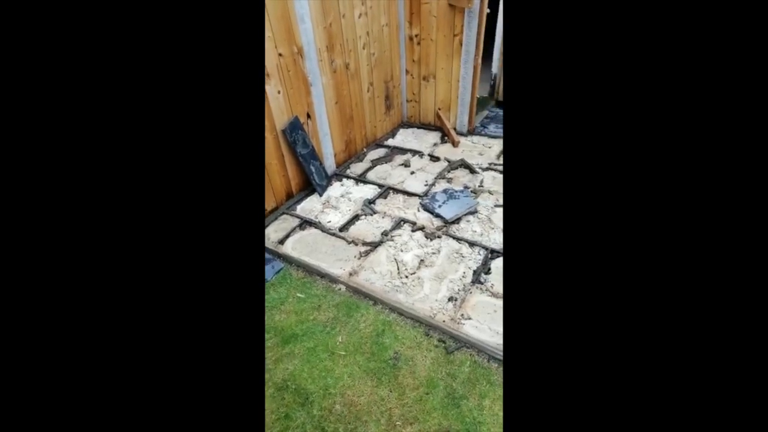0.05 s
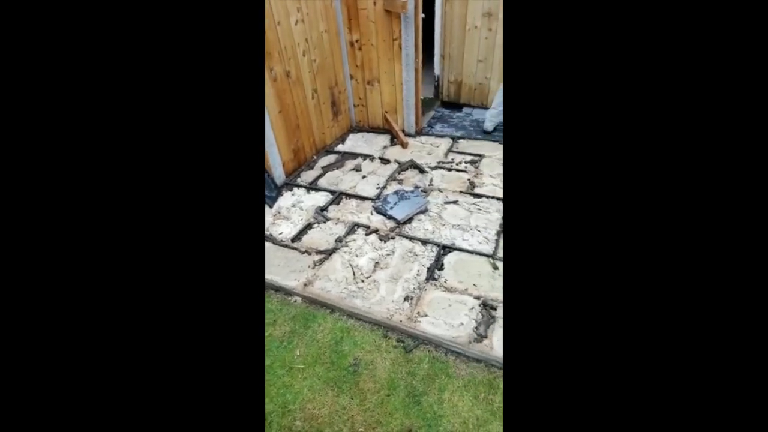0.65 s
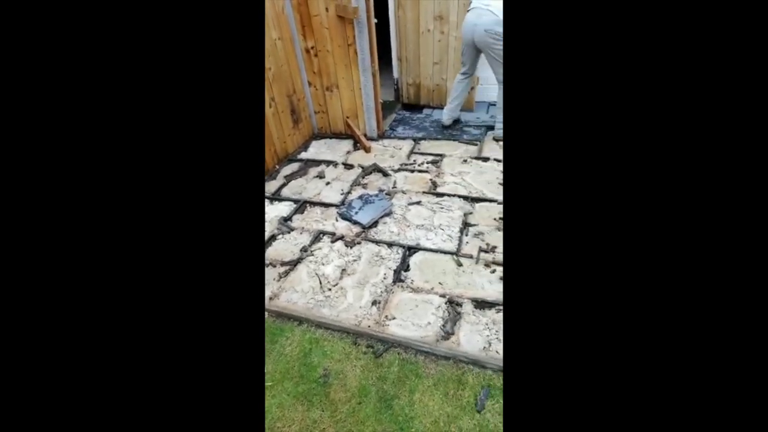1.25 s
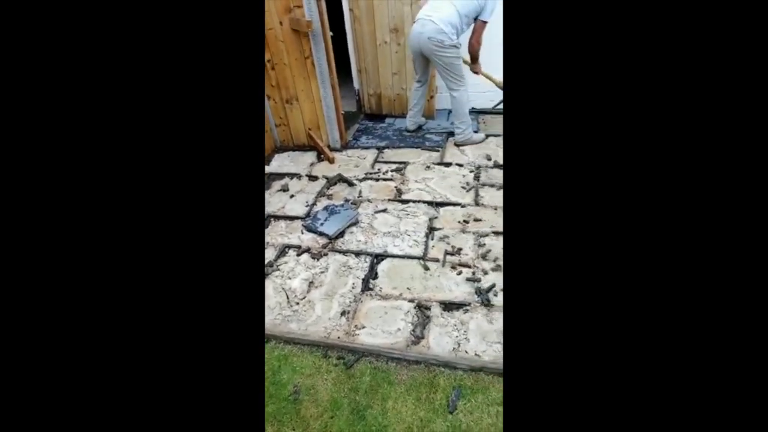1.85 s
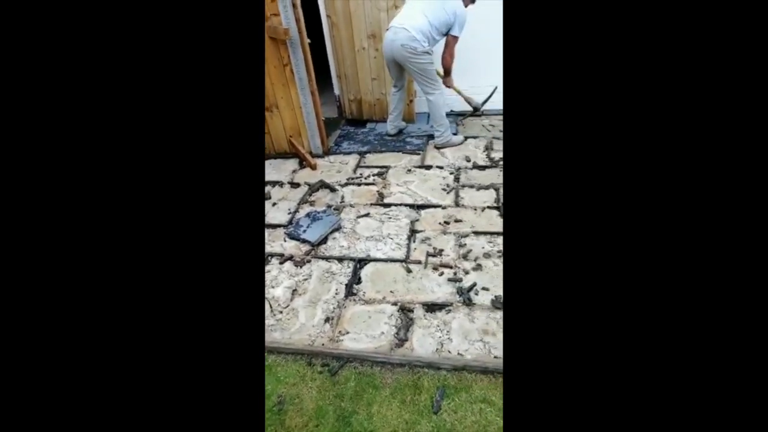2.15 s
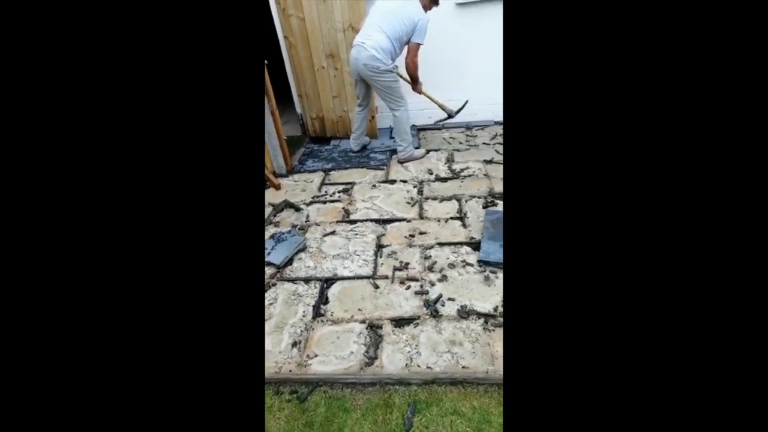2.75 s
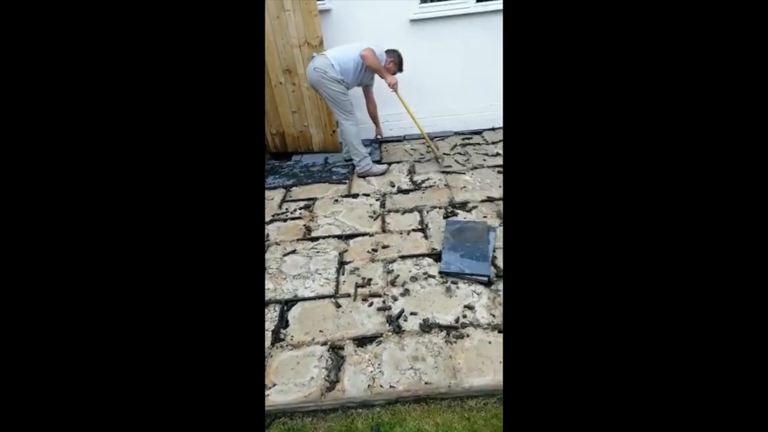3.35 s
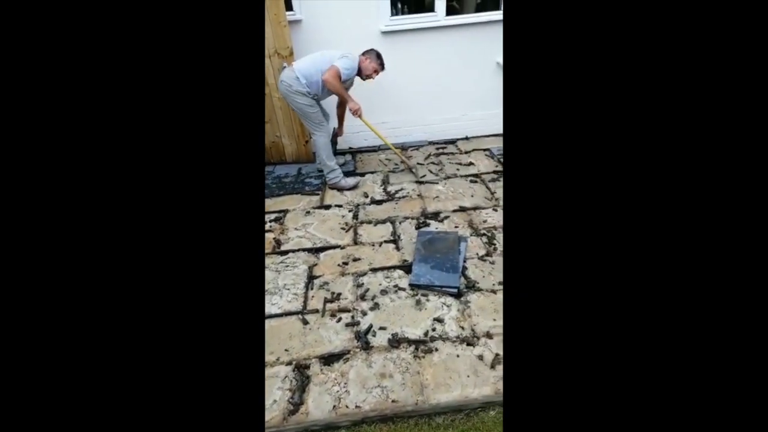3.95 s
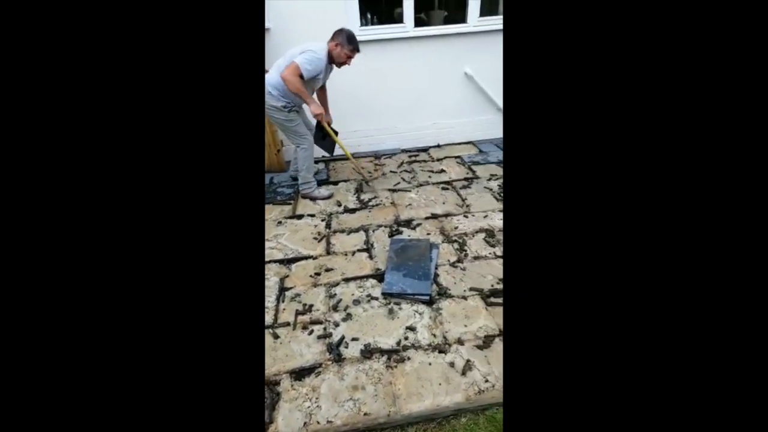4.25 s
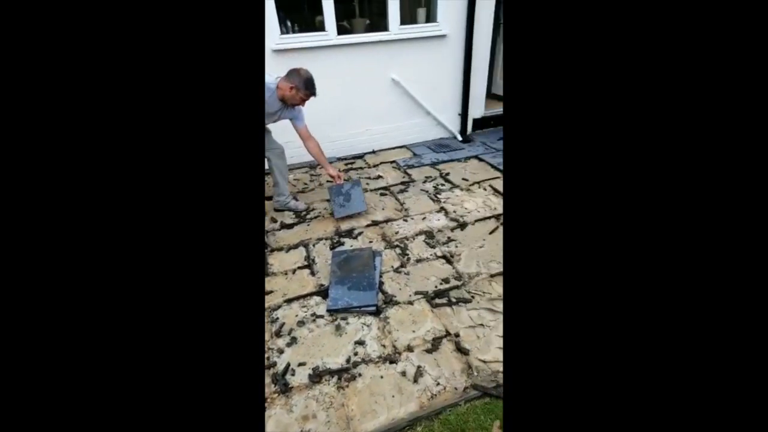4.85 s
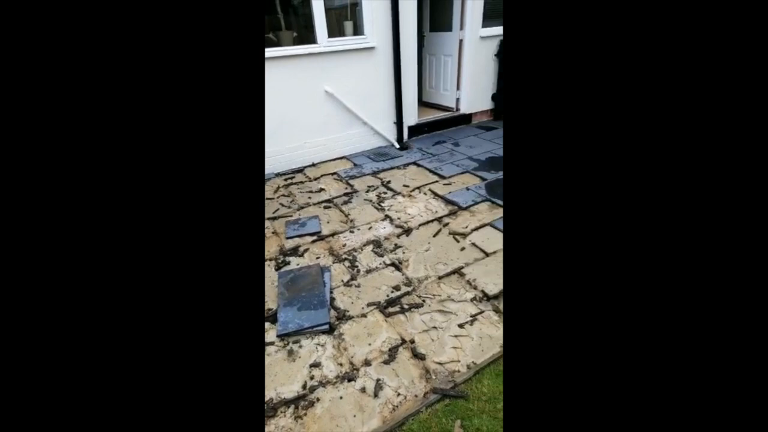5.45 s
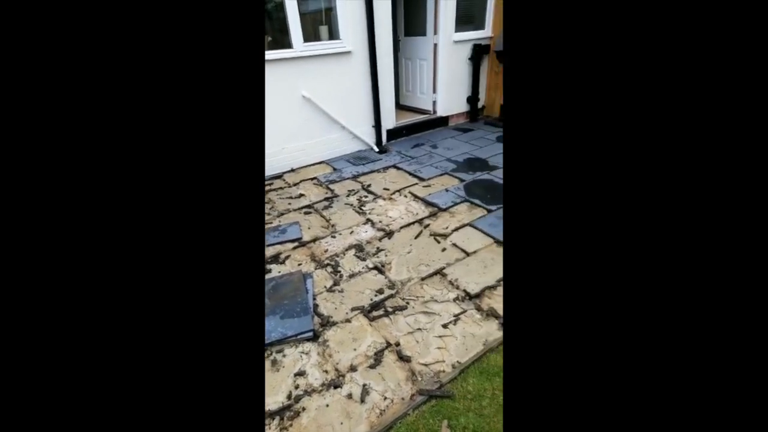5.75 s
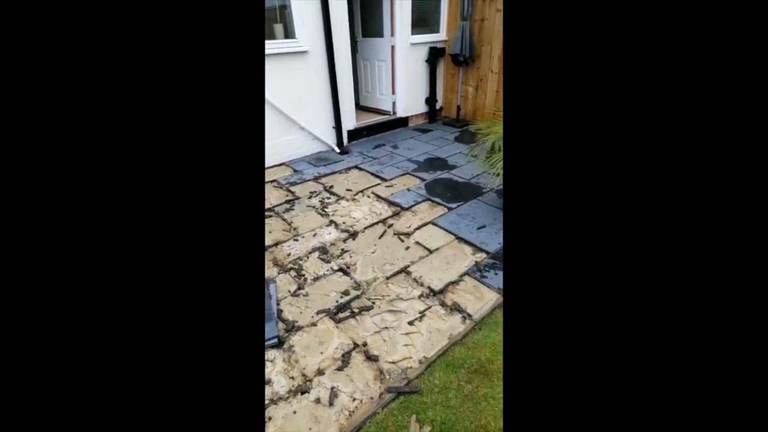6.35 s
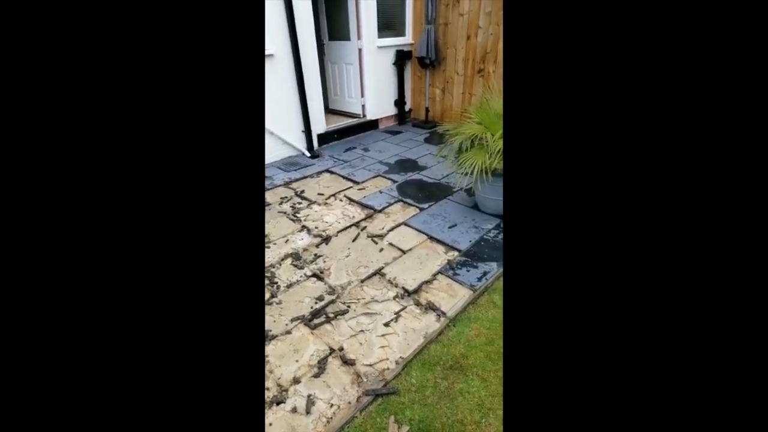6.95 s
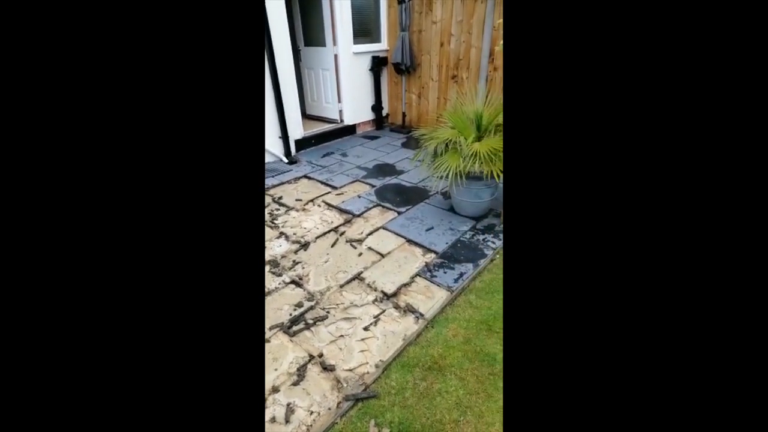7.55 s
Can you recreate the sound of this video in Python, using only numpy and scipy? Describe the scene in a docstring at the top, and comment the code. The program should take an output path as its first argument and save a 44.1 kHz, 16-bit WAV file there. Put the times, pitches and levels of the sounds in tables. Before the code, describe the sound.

Close, thudding pickaxe blows break mortar and lever up slate, which is tossed down with a clatter before light shovel scrapes.

```python
"""A walled patio, where slates are levered up with a pickaxe close by.
Mortar crunches and slabs thud under the ringing steel; one slate is dragged free, tossed aside
and clatters down. Grit slides, a chip skips, and a shovel scrapes as stones catch on its blade.
Two short bird chirps at the start and, later, one tiny high clink sound over a light breeze.
Wall and fences echo. The loudest blows overload the microphone."""
import sys
import numpy as np
from scipy import signal
from scipy.fft import rfft, irfft
from scipy.io import wavfile
from scipy.ndimage import uniform_filter1d

SR = 44100
rng = np.random.default_rng(int(sys.argv[2]) if len(sys.argv) > 2 else 0)


def store_pcm(level_fs):
    """Save levels as 16-bit WAV."""
    pcm = np.round(np.clip(level_fs, -1, 1) * 32767).astype(np.int16)
    wavfile.write(sys.argv[1], SR, np.atleast_2d(pcm).T)


N = 339084

# Spectra of distant wash, wind and crushed stone. Each row: frequency in Hz, relative density in dB.
WASH_SPECTRUM = [(15, -4), (25, -13), (48, 5.5), (69, -5.5), (133, -9), (188, -9.5), (567, -28),
                 (2060, -19.5), (3090, -27), (4500, -27.5), (8350, -43.5), (10900, -34), (14300, -53),
                 (15500, -68)]
WIND_SPECTRUM = [(15, -7.5), (30, -5.5), (65, 0), (120, -12.5), (220, -25), (600, -58)]
STONE_SPECTRUM = [(100, -17), (350, -12.5), (600, -14.5), (950, -5.5), (1550, -2), (2400, 0.5), (3200, -8),
                  (5000, -10.5), (7500, -18.5), (11000, -17.5), (15000, -31)]
# Gusts on the microphone. Each row: peak time in seconds, level in dB.
GUSTS = [(.5, -25.5), (1.06, -31), (1.33, -36), (2.29, -33), (3.15, -38), (5.84, -21.5)]
# Two bird chirps, then one tiny high clink. Each row: start and length in seconds,
# first and last pitch in Hz, level in dB.
CHIRPS_AND_CLINK = [(0.084, 0.064, 3680, 3480, -43), (0.137, 0.05, 3420, 3670, -43),
                    (2.342, 0.028, 6840, 6540, -37.5)]
# Echo decay. Each row: frequency in Hz, T60 in seconds.
ECHO_T60 = [(100, 0.85), (400, 0.64), (1500, 0.51), (2500, 0.64), (5000, 0.57), (12000, 0.55)]
# Echo colour. Each row: frequency in Hz, gain in dB.
ECHO_GAIN = [(100, -5.5), (400, -8), (1500, 1.5), (2500, -3.5), (5000, -7), (12000, -13.5)]
# Shovel resonances. Each row: frequency in Hz, width in Hz, relative level in dB.
BLADE_MODES = [(283, 84, -16), (440, 630, -21.5), (904, 27, -8.5), (1183, 20.6, 5.5), (1714, 16, 2.5),
               (1940, 38, 7.5), (2086, 9.9, 2), (2288, 5.4, 8.5), (2716, 4.5, 4.5), (2850, 14, -47),
               (3620, 29, -14), (4970, 84, -12.5), (10200, 4700, -32)]
# Shovel strokes. Each row: start and length in seconds, relative level in dB, width factor,
# pitch factor, tilt in dB/octave.
SHOVEL_STROKES = [(0.401, 0.18, -32.5, 5.5, 1.01, -7.5), (0.986, 0.011, -26.5, 1.1, 1.06, 1),
                  (1.055, 0.046, -20, 1.6, 1, -4.5), (6.109, .29, -26.5, 3.3, 1.02, -4),
                  (6.44, 0.085, -39.5, 3.3, 0.96, -9), (6.676, 0.23, -37.5, 3.2, 1.066, -4.5),
                  (7.089, 0.13, -32.5, 2.1, 1.025, -1.5), (7.552, 0.042, -39.5, 2.6, 0.96, -4),
                  (7.66, .06, -16.5, 0.85, .982, -1)]
# Sliding grit. Each row: peak time in seconds, level in dB, rise and fall in seconds, tilt in dB/octave.
GRIT_SLIDES = [(0.498, -30.5, 0.06, 0.13, -1), (.991, -32.5, 0.051, 0.053, 1),
               (1.414, -34, 0.026, 0.031, 5.5), (2.79, -16.5, .03, 0.077, -6),
               (3.07, -20.5, 0.02, 0.062, -5), (3.303, -38.5, .07, 0.12, 2.5), (3.74, -26, 0.038, 0.14, -5),
               (4.303, -47, 0.0097, 0.16, 1), (4.799, -33, .065, 0.43, 0),
               (5.545, -15.5, 0.028, 0.034, -1.5), (5.638, -31.5, 0.014, 0.099, -4.5),
               (6.2, -37, 0.21, 0.6, -1.5)]
# Slabs rocking under foot or lever. Each row: start in seconds, level in dB, mid-glide pitch in Hz,
# decay in seconds.
LOOSE_SLABS = [(0.451, -20, 115.4, 0.044), (.51, -21, 147, .069), (1.074, -14.5, 205, 0.033),
               (1.431, -21.5, 132, 0.0087), (3.922, -18.5, 185, 0.023)]
# Light touches of stone on stone. Each row: time in seconds, level in dB, tilt in dB/octave.
STONE_TAPS = [(.927, -31, -2), (.982, -26, 3.5), (2.494, -13, -1.5), (3.001, -37, -5.5), (3.052, -20, -6),
              (3.853, -27.5, -2), (4.71, -29, 2.5), (5.833, -31.5, -1.5), (6.088, -30.5, -6),
              (6.809, -38, 1.5), (7.069, -35, -12)]
# Slate or steel landing with its weight. Each row: time in seconds, crunch in dB, decay in seconds,
# tilt in dB/octave, thud in dB, mid-glide thud pitch in Hz.
LANDINGS = [(1.055, -18.5, 0.03, 1, -6.5, 108.8), (2.573, -21, 0.03, -1.5, -7, 193),
            (2.813, -7.5, 0.019, 1, -7.5, 176), (2.938, -2, 0.019, -1, -13, 168),
            (3.126, -11, 0.013, -1.5, 4.5, 181.3), (3.17, -21, .04, 0, -13.5, 164),
            (3.657, -29.5, 0.069, -4, -22, 215), (4.47, -18.5, 0.067, -1.5, -27.5, 189),
            (4.542, -15.5, 0.016, 2, -20.5, 194), (4.637, -17, 0.029, 2, -6.5, 163.6),
            (4.755, -23, 0.026, -7, -22.5, 211), (5.004, -19, 0.019, 6.5, -2, 199),
            (5.032, -4.5, 0.021, -9, 1.5, 194), (5.14, -1.5, 0.018, -5, -15, 238),
            (5.281, -4, 0.0056, -6, -14, 252), (5.484, -18, 0.055, -2.5, -30, 199.5)]
# Full swings into the joint. Each row: time in seconds, bite in dB, tilt in dB/octave,
# crumbling in dB, thud in dB, mid-glide thud pitch in Hz.
SWINGS = [(.215, -1, 1, -24, -3, 149.4), (1.604, 0, -1.5, -16.5, 0, 126.5),
          (2.203, -2, -1.5, -16, 2.5, 121.3)]
# Modes of a slate chip, a paver, the loose slate and the steel pick.
# Each row: frequency in Hz, relative level in dB, base T60 in seconds.
CHIP_MODES = [(2040, -13, 0.18), (2360, -6, .29), (4580, -12, 0.16), (5250, -20, 0.14)]
PAVER_MODES = [(601, 2, 0.18), (1232, -0.5, 0.46), (1476, -1, 0.42)]
SLATE_MODES = [(859.5, -10, 0.52), (1511, -5.5, 0.65), (1530, -2, 0.6), (2099, -0.5, 0.56),
               (2114, -3.5, 0.2), (3650, -8, 0.39), (4080, -27, 0.72), (4360, -19.5, 0.65),
               (6020, -27.5, 0.56), (7320, -23.5, 0.35), (9400, -31, 0.48), (10160, -30, 0.43),
               (11600, -27, 0.28)]
PICK_MODES = [(714, -8, 0.68), (969, -4.5, 0.89), (1211, 2, 0.75), (1438, 9, 0.65), (1544, 8, 0.6),
              (1638, 3.5, 0.52), (1935, -8, 0.51), (2190, 8.5, 0.26), (2275, -2, 0.24), (2330, 3, 0.68),
              (2635, -16, 0.25), (2873, 8.5, 0.21), (3590, -17, 0.98), (3960, -3.5, 0.24), (4350, -8, 0.34),
              (4870, -16, 0.52), (5260, -15, 0.29), (5650, -19, 0.31), (6390, -12, 0.53),
              (10540, -10, 0.47)]
# Blows on those bodies. Each row: start in seconds, level in dB, focus in Hz, T60 factor.
CHIP_SKIPS = [(4.471, -20, 4850, 0.69), (4.488, -20.5, 4700, .9), (4.502, -18, 2400, 0.93),
              (4.659, -11.5, 2400, 0.89)]
PAVER_BLOWS = [(5.032, -13, 1190, 1), (5.138, -0.5, 1400, 0.4), (5.279, -3.5, 780, 0.51)]  # the slate bounces on it three times
SLATE_BLOWS = [(2.812, -6, 1910, 0.62), (3.655, -27, 6350, 0.62), (3.70, -23, 2850, 0.92),
               (3.846, -10.5, 2450, 0.91), (3.878, -9, 2540, 0.86), (3.897, -14.5, 850, 0.68),
               (5.001, -8.5, 3860, 0.38), (5.06, -5, 2150, 0.54), (5.139, 4.5, 1490, 0.63),
               (5.16, 3, 1550, 0.44), (5.215, -4, 1600, 0.3), (5.279, -4.5, 2390, 1)]  # worked free, then clattering down
PICK_BLOWS = [(1.606, -17, 1760, 0.66), (1.665, -10.5, 1780, 0.79), (2.21, -9.5, 2200, 1),
              (2.492, -8, 3250, 1), (2.515, -10.5, 1310, 0.15), (2.569, -19, 2650, 1),
              (2.757, -21.5, 3380, 1), (2.778, -13, 710, 1), (2.812, -11, 1560, 0.75),
              (2.938, -8, 4000, .7), (2.96, -15.5, 1540, 0.95), (3.003, -16.5, 4030, 0.53),
              (3.047, -12.5, 2040, 0.87)]
# Likeness of the two channels. Each row: frequency in Hz, correlation.
MIC_CORRELATION = [(150, 1), (300, 0.78), (600, 0.027), (2000, 0.17), (5000, 0)]
# Balance of the microphone ports. Each row: frequency in Hz, left minus right in dB.
MIC_BALANCE = [(200, .5), (550, 0), (800, -2), (1200, 3), (2200, 4.5), (4000, -0.3), (9000, -1)]

CRUMBLE_DELAY_S = 0.048


def gain_of(db):
    """Decibels to amplitude."""
    return 10 ** (np.asarray(db) / 20)


def unit_rms(x):
    """Scales to unit rms."""
    return x / np.sqrt(np.mean(x ** 2) + 1e-20)


def curve_at(points, hz):
    """Interpolates on a log-frequency axis."""
    point_hz, value = np.transpose(points)
    return np.interp(np.log(hz + 1), np.log(point_hz + 1), value)


def add(mix, start_s, sound):
    """Adds a stereo sound to the mix."""
    part = mix[:, round(start_s * SR):][:, :sound.shape[1]]
    part += sound[:, :part.shape[1]]


def paired(x):
    """Two unrelated signals become a microphone pair: alike in the bass, apart in the treble."""
    left, other = rfft(x)
    shared = curve_at(MIC_CORRELATION, np.fft.rfftfreq(x.shape[1], 1 / SR))
    right = shared * left + np.sqrt(1 - shared ** 2) * other
    return irfft(np.array([left, right]), x.shape[1])


def coloured(x, spectrum, tilt_db=0):
    """Applies a spectrum, tilted about 2 kHz; returns unit rms."""
    hz = np.fft.rfftfreq(x.shape[1], 1 / SR)
    octaves = np.log2((hz + 200) / 2200)
    return unit_rms(irfft(rfft(x) * gain_of(curve_at(spectrum, hz) + tilt_db * octaves), x.shape[1]))


def noise(size, spectrum):
    """Coloured stereo noise at unit rms."""
    return coloured(paired(rng.standard_normal((2, size))), spectrum)


def grains(size, spread_db, per_s):
    """A dense run of tiny fractures, some larger than the rest."""
    t = np.arange(size) / SR
    sizes_db = spread_db * np.minimum(rng.exponential(1, 16384), 4)
    envelope = gain_of(np.interp(t * per_s, np.arange(len(sizes_db)), sizes_db))
    return paired(rng.standard_normal((2, size)) * envelope)


def open_air(wash_db=-40, breeze_db=-43, gust_s=0.068):
    """Distant wash, and a gusting breeze rumbling on the microphone."""
    t = np.arange(N) / SR
    wash = gain_of(wash_db) * noise(N, WASH_SPECTRUM)
    gusts = sum(gain_of(db) * np.exp(-abs(t - peak_s) / gust_s) for peak_s, db in GUSTS)
    return wash + (gain_of(breeze_db) + gusts) * noise(N, WIND_SPECTRUM)


def chirps_and_clink(waver=0.016):
    """Two short bird chirps at the start, then one tiny high clink; each a gliding tone."""
    out = np.zeros((2, N))
    for start_s, length_s, first_hz, last_hz, db in CHIRPS_AND_CLINK:
        size = round(length_s * SR)
        wobble = unit_rms(uniform_filter1d(rng.standard_normal(SR), size=120))[:size]
        hz = np.linspace(first_hz, last_hz, size) * (1 + waver * wobble)
        tone = np.sin(2 * np.pi * np.cumsum(hz) / SR) * signal.windows.tukey(size, 0.5)
        add(out, start_s, gain_of(db) * np.array([tone, tone]))
    return out


def patio_echo(x, predelay_s=0.0055, reflections_per_s=3000):
    """House wall and fences scatter the sound; each band dies at its own rate."""
    reflections = paired(rng.standard_normal((2, SR)) * (rng.random((2, SR)) < reflections_per_s / SR))
    hz, t, bands = signal.stft(unit_rms(reflections), SR, nperseg=256)
    decay_per_s = np.log(1000) / curve_at(ECHO_T60, hz)[:, None]
    envelope = np.exp(-decay_per_s * t) * np.sqrt(2 * decay_per_s / SR)  # unit energy
    bands = bands * gain_of(curve_at(ECHO_GAIN, hz))[:, None] * envelope
    onset = np.clip(np.arange(SR) / SR / predelay_s - 1, 0, 1)
    tail = signal.istft(bands, SR, nperseg=256)[1][:, :SR] * onset
    return signal.fftconvolve(x, tail, axes=1)[:, :N]


def shovel(trim_db=2, dull_hz=7500, push_s=0.024, release_s=0.043, ease_db_per_s=11):
    """Stones catch on the blade and drive its resonances; pressure damps and detunes them."""
    out, t = np.zeros((2, N)), np.arange(SR) / SR - 0.2
    hz = np.fft.rfftfreq(SR, 1 / SR)
    for start_s, length_s, db, damping, detune, tilt_db in SHOVEL_STROKES:
        blade = 0
        for mode_hz, width_hz, mode_db in BLADE_MODES:
            off_resonance = (hz ** 2 - (mode_hz * detune) ** 2) / (damping * width_hz * hz + 1)
            blade += gain_of(mode_db) / (1 + 1j * off_resonance)
        blade *= gain_of(tilt_db * np.log2(np.clip(hz, 500, 2500)))
        blade /= 1 + (hz / dull_hz) ** 3  # bedding sand dulls the contact
        # digs in, eases as it travels, lifts off
        force = gain_of(db + trim_db - ease_db_per_s * np.maximum(t, 0))
        contact = np.exp(np.minimum(t, 0) / push_s - np.maximum(t - length_s, 0) / release_s)
        scrape = unit_rms(irfft(rfft(grains(SR, spread_db=3, per_s=120)) * blade, SR))
        add(out, start_s + t[0], force * contact * scrape)
    return out


def sliding_grit():
    """Loose grit swells and fades under moving stone."""
    out, t = np.zeros((2, N)), np.arange(SR) / SR - 0.4
    for peak_s, db, rise_s, fall_s, tilt_db in GRIT_SLIDES:
        swell = np.where(t < 0, np.exp(-(t / rise_s) ** 2 / 2), np.exp(-abs(t) / fall_s))
        grit = coloured(grains(len(t), spread_db=1.5, per_s=310), STONE_SPECTRUM, tilt_db)
        add(out, peak_s + t[0], gain_of(db) * swell * grit)
    return out


def falling_crumbs(relative_db=-21, per_s=110, spread_db=1.5, settle_s=0.087):
    """Mortar thrown up by each full swing patters down, ever smaller."""
    out, t = np.zeros((2, N)), np.arange(SR * 3 // 5) / SR
    for swing_s, db, *_ in SWINGS:
        sizes = gain_of(spread_db * rng.standard_normal(len(t)))
        hits = rng.random(len(t)) < per_s / SR
        clicks = paired(sizes * hits * rng.standard_normal((2, len(t))))
        patter = coloured(clicks, STONE_SPECTRUM, tilt_db=-3.5) * np.exp(-t / settle_s)
        add(out, swing_s + CRUMBLE_DELAY_S, gain_of(db + relative_db) * patter)
    return out


def slab_thuds(rise_s=0.0015, lead_s=0.00286, swing_decay_s=0.019, sag=0.56, sag_s=0.024, rattle_db=-5):
    """A loaded slab rocks for a few slowing cycles and rattles on its bed."""
    out, t = np.zeros((2, N)), np.arange(SR // 2) / SR
    # the weight lands just before the crunch peaks
    loads = [(at_s - lead_s, db, hz, swing_decay_s) for at_s, *_, db, hz in SWINGS]
    loads += [(at_s - lead_s, db, hz, decay_s) for at_s, _, decay_s, _, db, hz in LANDINGS]
    for start_s, db, hz, decay_s in loads + LOOSE_SLABS:
        glide_hz = hz * (1 + sag * (np.exp(-t / sag_s) - 0.5))
        rocking = np.sin(2 * np.pi * np.cumsum(glide_hz) / SR) * np.exp(-t / (0.7 * decay_s))
        bed_spectrum = [(hz / 5, -26), (hz * 0.5, -3), (hz * 1.5, 0), (hz * 1.73, -11),
                        (750, -14), (2500, -40), (9000, -70)]
        rattle = gain_of(rattle_db) * noise(len(t), bed_spectrum) * np.exp(-t / decay_s)
        add(out, start_s, gain_of(db) * (rocking + rattle) * (1 - np.exp(-t / rise_s)))
    # a slab is too small to radiate below 34 Hz
    return signal.sosfilt(signal.butter(2, 34, "high", fs=SR, output="sos"), out)


def crunches(rise_s=0.004, tap_s=0.025, bite_s=0.013, break_delay_s=0.019, break_s=0.02, crumble_s=0.08):
    """Each contact is a burst of fractures; a full swing bites, breaks and crumbles the mortar."""
    out, t = np.zeros((2, N)), np.arange(SR // 2) / SR - 0.006
    contacts = [row[:4] for row in LANDINGS]
    contacts += [(at_s, db, tap_s, tilt_db) for at_s, db, tilt_db in STONE_TAPS]
    for at_s, db, tilt_db, crumble_db, *_ in SWINGS:
        contacts += [(at_s, db, bite_s, tilt_db),
                     (at_s + break_delay_s, db - 3, break_s, tilt_db - 3.5),
                     (at_s + CRUMBLE_DELAY_S, crumble_db, crumble_s, -4.5)]
    for peak_s, db, decay_s, tilt_db in contacts:
        burst = coloured(grains(len(t), spread_db=2, per_s=700), STONE_SPECTRUM, tilt_db)
        envelope = np.exp(-abs(t) / np.where(t < 0, rise_s, decay_s))
        add(out, peak_s + t[0], gain_of(db) * burst * envelope)
    return out


def struck_body(modes, blows, focus_db, chatter, chatter_per_s, focus_octaves=0.54, rise_s=0.0011):
    """Each blow reweights the modes near one pitch; loose ground contact makes them flutter."""
    out, t = np.zeros((2, N)), np.arange(SR * 3 // 5) / SR
    hz, mode_db, t60_s = np.transpose(modes)[:, :, None]
    tones = np.exp(2j * np.pi * hz * t)
    for start_s, db, focus_hz, t60_factor in blows:
        nearness = np.exp(-(np.log2(hz / focus_hz) / focus_octaves) ** 2)
        weight = gain_of(mode_db + focus_db * nearness)
        knots = rng.standard_normal((len(modes), 192, 2)) @ [1, 1j]
        flutter = np.array([np.interp(t * chatter_per_s, np.arange(len(k)), k) for k in knots])
        decay = np.exp(-np.log(1000) * t / (t60_s * t60_factor))
        partials = weight / np.linalg.norm(weight) * decay * tones * (1 + chatter * flutter)
        # each mode reaches the two microphone ports out of step
        lag_rad = np.outer([0, 1], rng.choice([-1, 1], len(modes))) * 1.24
        phase_rad = rng.uniform(0, 2 * np.pi, len(modes)) + lag_rad
        ring = (np.exp(1j * phase_rad) @ partials).real
        add(out, start_s, gain_of(db) * ring * (1 - np.exp(-t / rise_s)))
    return out


def scene(thud_send_db=-2.5, ring_send_db=-7, scrape_send_db=-7):
    """All sources, their echo, and the open air."""
    short_sounds = crunches() + falling_crumbs() + chirps_and_clink()
    thuds = slab_thuds()
    ringing = struck_body(PICK_MODES, PICK_BLOWS, focus_db=15, chatter=1.0, chatter_per_s=120)
    ringing += struck_body(SLATE_MODES, SLATE_BLOWS, focus_db=8, chatter=0.62, chatter_per_s=140)
    ringing += struck_body(PAVER_MODES, PAVER_BLOWS, focus_db=-0.5, chatter=0.98, chatter_per_s=83)
    ringing += struck_body(CHIP_MODES, CHIP_SKIPS, focus_db=27, chatter=0.47, chatter_per_s=89)
    scrapes = sliding_grit() + shovel()
    send = (short_sounds + gain_of(thud_send_db) * thuds
            + gain_of(ring_send_db) * ringing + gain_of(scrape_send_db) * scrapes)
    return short_sounds + thuds + ringing + scrapes + patio_echo(send) + open_air()


def record(dry):
    """The two ports colour the sound differently; peaks flatten at full scale; low-pass at 15.6 kHz."""
    balance_db = curve_at(MIC_BALANCE, np.fft.rfftfreq(N, 1 / SR))
    at_ports = irfft(rfft(dry) * gain_of(np.outer([0.5, -0.5], balance_db)), N)
    clipped = at_ports / (1 + at_ports ** 6) ** (1 / 6)
    lowpass = signal.firwin(255, 15600, window=("kaiser", 8), fs=SR)
    return signal.oaconvolve(clipped, lowpass[None], "same")


dry = scene()
out = record(dry)
store_pcm(out)
```